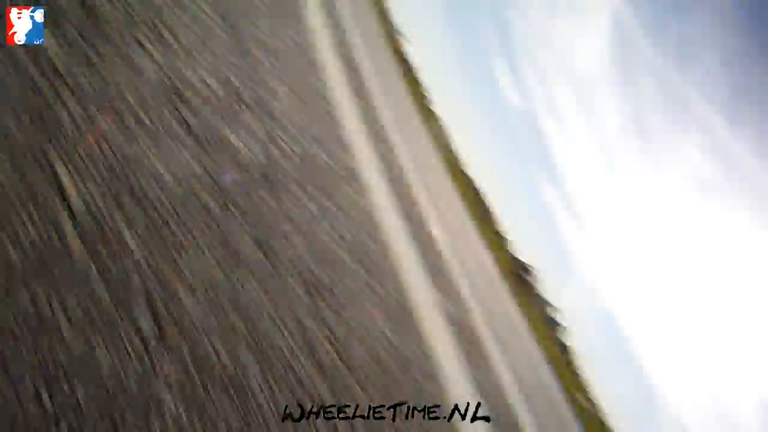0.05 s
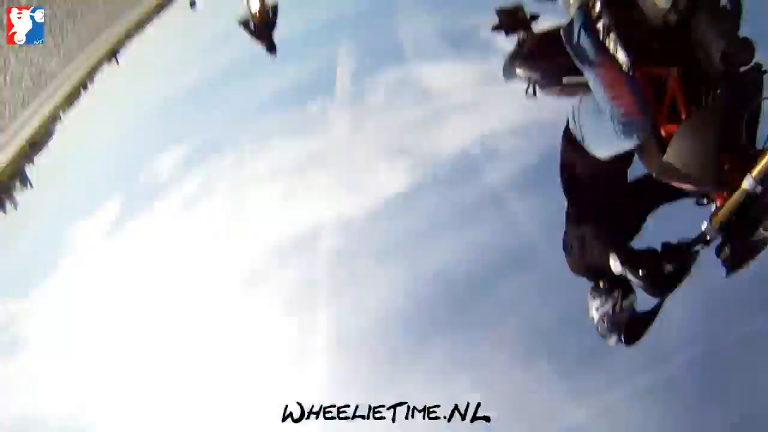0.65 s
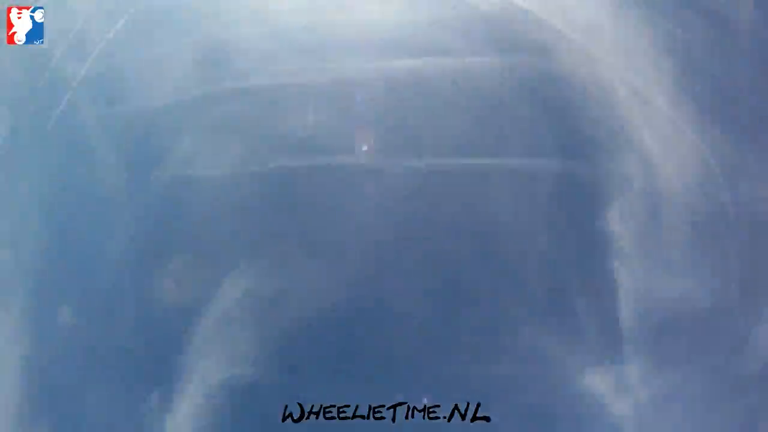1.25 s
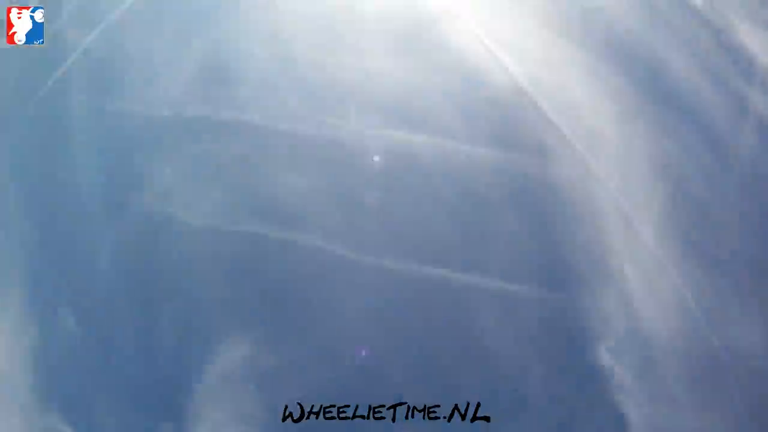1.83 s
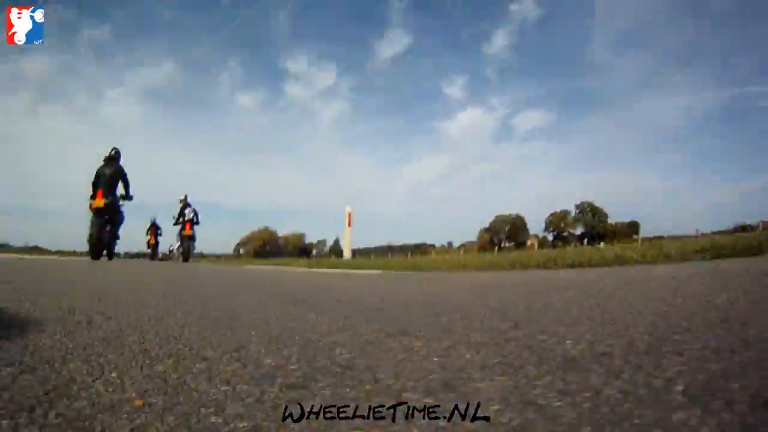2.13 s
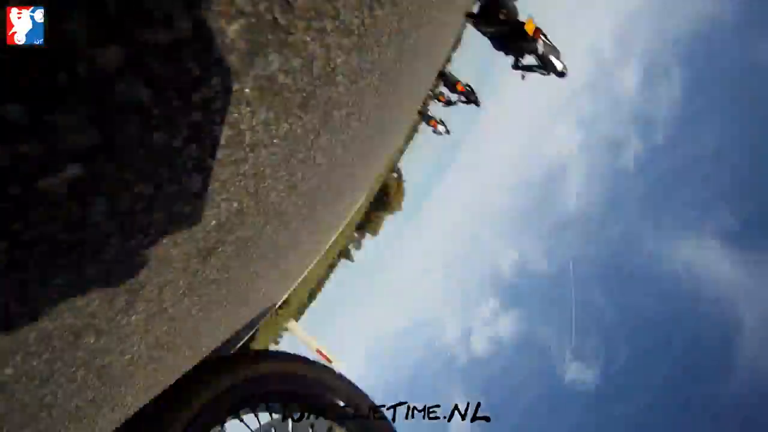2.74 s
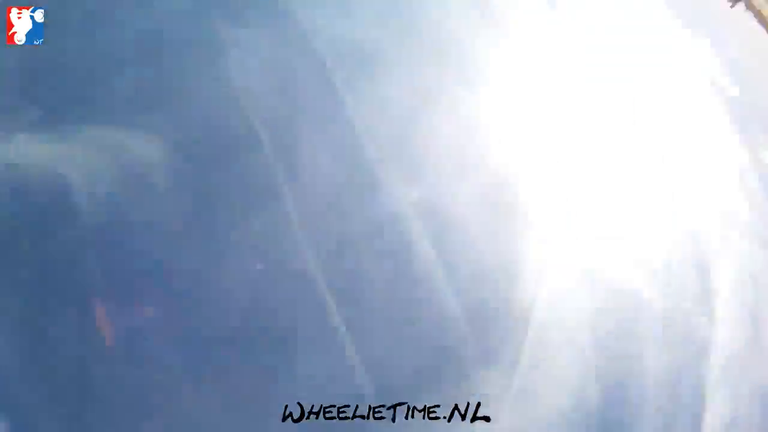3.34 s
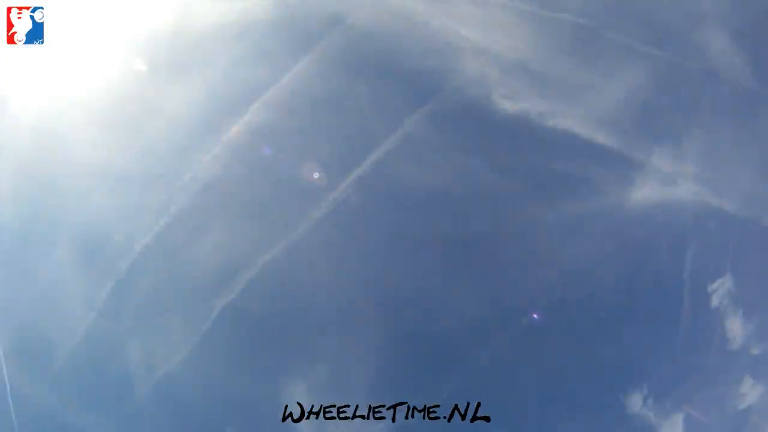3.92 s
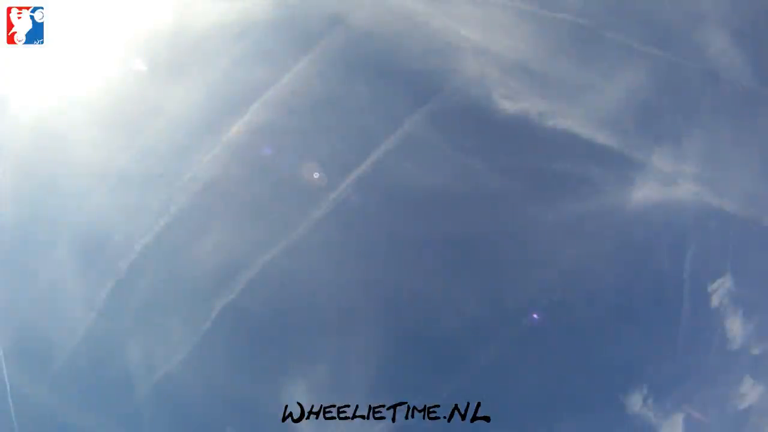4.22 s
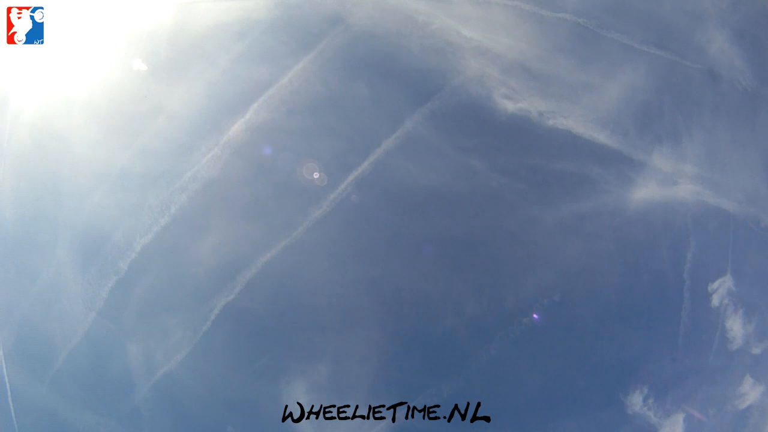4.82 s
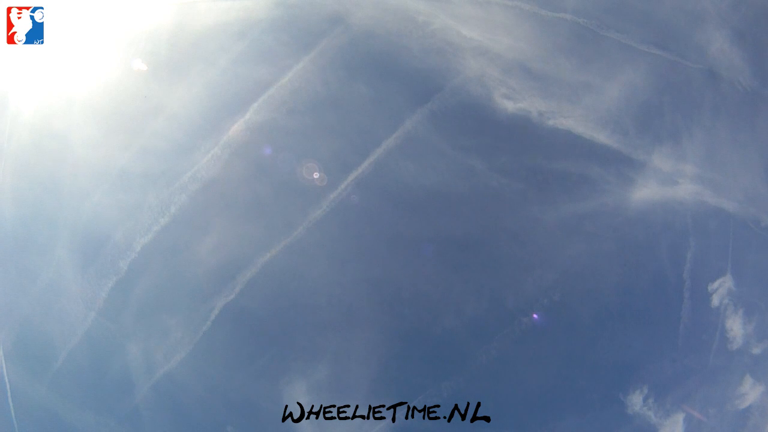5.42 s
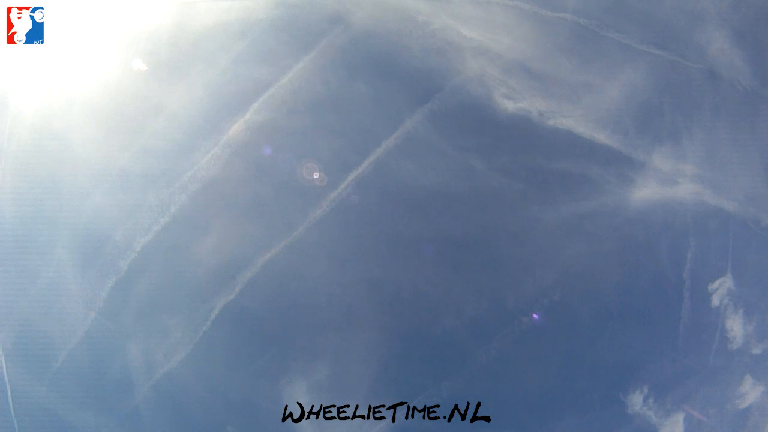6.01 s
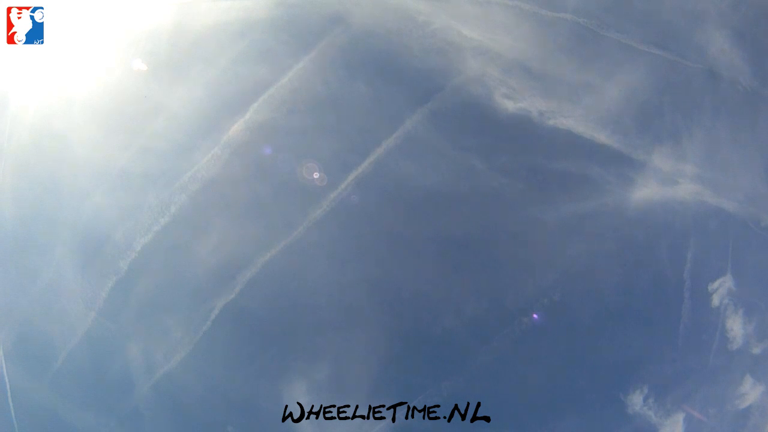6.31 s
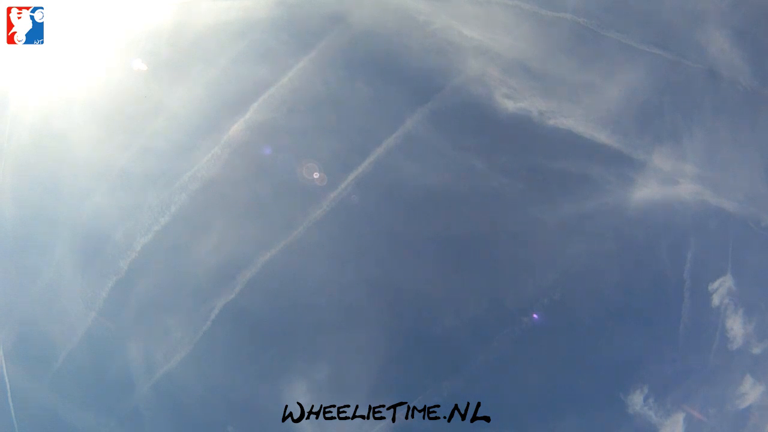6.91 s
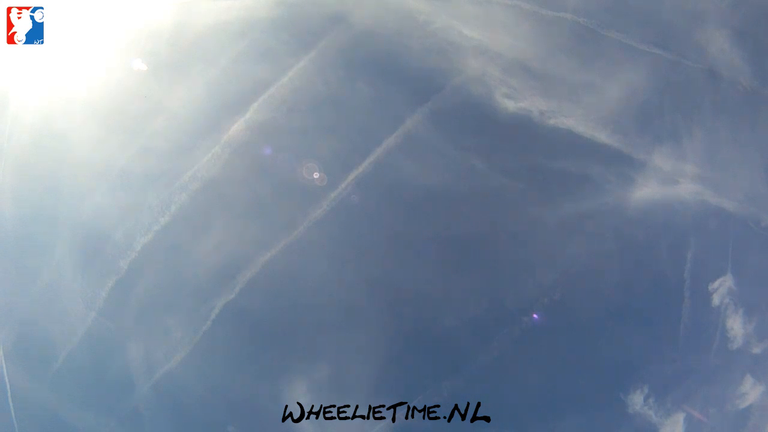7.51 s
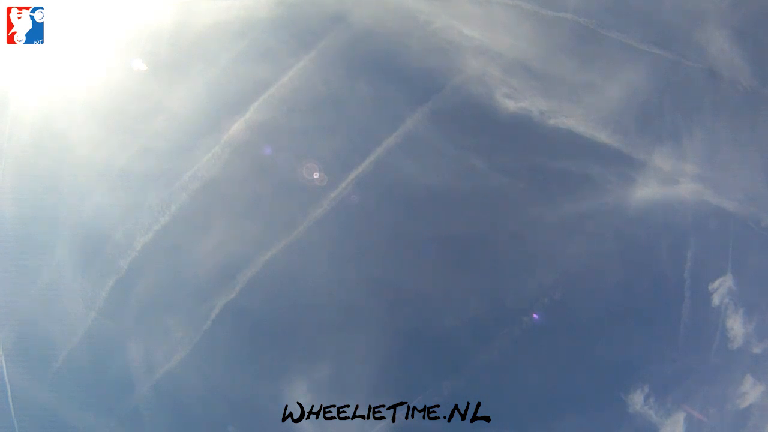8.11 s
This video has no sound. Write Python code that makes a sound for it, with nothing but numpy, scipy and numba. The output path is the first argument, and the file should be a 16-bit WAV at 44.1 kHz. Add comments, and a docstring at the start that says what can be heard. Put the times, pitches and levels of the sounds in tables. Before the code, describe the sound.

Harsh plastic knocks tumble over a road through buffeting wind, then give way to low motorcycle engines and a soft brake rasp.

```python
"""Camera tumbling down a road

A small camera falls off a motorcycle, clatters over asphalt, rocks to rest and lies in the wind
while bikes run nearby with throbbing exhausts, a gear whine, a rush of tyres and rasping brakes.
Each knock rings the plastic shell and the hard ones overload the microphone; the gain control ducks,
then lets wind and engines swell back. Samples held at 12000 a second add a glassy fizz."""
import sys
import numpy as np
from scipy import signal
from scipy.fft import rfft, irfft
from scipy.io import wavfile
from scipy.ndimage import uniform_filter1d, map_coordinates
from numba import njit

SR = 44100
rng = np.random.default_rng(int(sys.argv[2]) if len(sys.argv) > 2 else 0)


def output_pcm(signal):
    """Save a mono or channel-first signal as 16-bit PCM at the path in sys.argv[1].

    Samples are clipped to [-1, 1] before scaling.
    """
    pcm = np.clip(np.atleast_2d(signal).T, -1, 1) * 32767
    wavfile.write(sys.argv[1], SR, np.round(pcm).astype(np.int16))


N = 359415
TIME = np.arange(N) / SR

# air past the microphone, strong in flight and a breeze at rest: t/s, rumble level/dB
AIRFLOW = [(0, -11.5), (.17, -17.5), (.3, -16.5), (.5, -12.5), (1, -18.5), (1.55, -8), (2.2, -16.5),
           (2.5, -24.5), (2.75, -17), (3.05, -26.5), (3.3, -20.5), (3.75, -23), (4.2, -21), (5, -26),
           (5.9, -25.5), (6.6, -28), (7.5, -23.5), (8.15, -25.5)]
# tone colours of the low rumble and of the air and tyre hiss: f/Hz, level/dB
RUMBLE_SPECTRUM = [(20, -12), (35, -9.5), (60, 0.5), (110, 3.5), (200, -5), (320, -9.5), (520, -15),
                   (640, -20), (790, -38.5), (1200, -62.5)]
HISS_SPECTRUM = [(300, -20.5), (700, -0.5), (1100, 2.5), (1450, 0), (1900, 1), (2450, 1.5), (3300, -0.5),
                 (4200, -11.5), (5500, -35)]
# one bike rides off, one passes, one rolls up: t/s, exhaust pulse rate/Hz, level/dB
LEAVING_RIDE = [(0, 54, -34), (.4, 55.7, -22), (1.1, 53.5, -28), (1.6, 47, -25), (2.25, 46.5, -21),
                (2.42, 46.5, -15.5), (2.7, 45, -21), (3.1, 42, -23), (3.7, 48, -39)]
PASSING_RIDE = [(3.8, 28.5, -31), (4.05, 28, -25), (4.35, 27.8, -20), (4.62, 25.65, -21.5),
                (5.3, 25.7, -23), (5.47, 28, -19), (5.56, 28, -25), (5.8, 24, -30), (6.1, 24, -50)]
ROLLING_RIDE = [(5.7, 68.15, -38.5), (6.1, 67.85, -28), (6.35, 67.78, -26), (6.7, 67.25, -24.5),
                (7, 68.82, -24), (7.4, 68.4, -25), (7.7, 68.66, -27), (8.15, 69.3, -25.5)]
# resonances of their exhaust pipes: f/Hz, width/Hz, level/dB
LEAVING_EXHAUST = [(72, 31, -6), (105.5, 24, -0.5), (168, 25, -1.5)]
PASSING_EXHAUST = [(56, 33, -5), (134, 24.4, 2.5), (159.4, 60, -7), (236, 26, -6), (291.5, 20, -11.5),
                   (332, 11, -15), (425.5, 23.6, -8), (581, 29, -20)]
ROLLING_EXHAUST = [(69, 43, -7), (136.6, 21, -1), (267.7, 41, -9), (370, 114, -19)]
# grit touching the shell: t/s, level/dB
GRIT_TICKS = [(.109, -21), (.153, -26.5), (4.258, -40), (6.074, -36), (6.127, -41), (6.901, -46),
              (6.924, -35), (6.972, -42)]
# shell hits on asphalt, 0 dB near microphone overload: t/s, crack level/dB, thud level/dB, clack f/Hz
ROAD_HITS = [(0.5091, 13, 8, 3049), (0.518, 8, -2, 2960), (0.764, 15.5, 8.5, 2815),
             (1.0371, 14.5, 10.5, 3070), (1.07, 8, 4, 2660), (1.16, 10, 3.5, 3302), (1.191, 11, 6, 4400),
             (1.2751, 11.5, -4.5, 3287), (1.2993, 12.5, 6, 3700), (1.3663, 10.5, -4, 2800),
             (1.3858, 9, 0.5, 2700), (1.3949, 16, 8.5, 2570), (1.4728, 17.5, 6, 2783),
             (1.488, 16, -5, 3520), (1.597, 9, 4.5, 2536), (1.6228, 14.5, 11, 3225), (1.6349, 6, 1, 2420),
             (1.6767, 4, 6, 3550), (1.7003, 12.5, 2.5, 3058), (1.7438, 6.5, -2, 2460),
             (1.7889, 12.5, 1.5, 3624), (1.8301, 18, 9, 3800), (1.877, 10.5, 5, 2895),
             (1.9183, 11.5, 10, 3565), (1.9326, 8.5, 7.5, 2620), (1.944, 15, 11, 2434),
             (1.965, 4, 6.5, 3750), (2.0103, 10, 2.5, 1171), (2.0601, 8.5, -0.5, 2720),
             (2.117, 13.5, 8.5, 2640), (2.1539, 13, 9, 1200), (2.2415, 5, -4, 2990),
             (2.2618, 7.5, 5.5, 3750), (2.2932, 1, 4.5, 3320), (2.561, 15.5, 4.5, 2400),
             (2.57, 11.5, 4.5, 2650), (2.7926, 7, 7.5, 2206), (2.8427, 1, 3, 2716), (3.0888, 6, 16.5, 3835),
             (3.099, 2.5, 14, 3070), (3.118, 13, 6, 2156), (3.3238, 19, 23.5, 2162), (3.347, 8, 10, 2810),
             (3.3953, -3, 8.5, 4060), (3.443, -9, -3, 2680), (3.4822, 13, 14, 3860), (3.531, 3, 4.5, 3750),
             (3.568, -7, 13.5, 3630), (3.581, 5, 16.5, 3830), (3.6275, 3.5, 16.5, 3930),
             (3.652, -5, -14, 2900)]
# modes of the plastic shell: f/Hz, level/dB, t60/s
SHELL_MODES = [(287, -28, 0.063), (520.2, -11, 0.036), (688, -16, 0.038), (1173, -3, 0.031),
               (1597, -25, 0.027), (2135, -12, 0.023), (2480, -6, 0.018), (2910, -2.5, 0.012),
               (3137, -19, 0.029), (3709, -11.5, 0.028), (4263, -24.5, 0.029), (4546, -26.5, 0.031)]
# pads on a brake disc: firmest touch t/s, level/dB, swell/(dB/s), fade/(dB/s), centre f/Hz,
# upward glide/(share of f on either side)
BRAKE_RUBS = [(5.73, -49, 55, 117, 3180, 0.0083), (7.48, -43, 31, 21.5, 2943, .12)]
# resonances of the disc: f/Hz, level/dB
DISC_MODES = [(2530, 2.5), (3050, -1), (3520, -2.5), (4250, -6)]

OVERLOAD_DB = 16.5   # where the microphone saturates
ROCK_GAP_S = .012   # between touches as the shell settles


def from_db(db):
    """Decibels to gain."""
    return 10 ** (np.asarray(db) / 20)


def unit_rms(x):
    """Scale to unit rms."""
    return x / np.sqrt(np.mean(x ** 2) + 1e-20)


def automation(rows):
    """The columns of a breakpoint curve at every sample."""
    times, *columns = np.transpose(rows)
    return [np.interp(TIME, times, column) for column in columns]


def drift(rate):
    """Smooth random motion of unit rms that changes about rate times a second."""
    knots = rng.standard_normal(30000)
    return unit_rms(map_coordinates(knots, [TIME * rate], order=2, mode="wrap"))


def coloured_noise(spectrum):
    """Noise of unit rms with the given spectrum."""
    hz, db = np.transpose(spectrum)
    bins = np.maximum(np.fft.rfftfreq(N, 1 / SR), 1)
    gain = from_db(np.interp(np.log(bins), np.log(hz), db)) * np.minimum(bins / hz[0], 1)
    return unit_rms(irfft(rfft(rng.standard_normal(N)) * gain, N))


def band_noise(low_hz, high_hz):
    """Noise of unit rms between two soft edges."""
    band = signal.butter(2, [low_hz, high_hz], "band", fs=SR, output="sos")
    return unit_rms(signal.sosfilt(band, rng.standard_normal(N)))


def narrow_noise(hz, rate):
    """Noise of unit rms around a pitch; it wavers about rate times a second."""
    phase = 2 * np.pi * np.cumsum(hz * np.ones(N)) / SR
    return drift(rate) * np.cos(phase) + drift(rate) * np.sin(phase)


def ring(age, hz, t60):
    """A struck mode: a dying sine, silent before age 0."""
    age = np.maximum(age, 0)
    return np.sin(2 * np.pi * hz * age) * from_db(-60 * age / t60)


def resonance(x, hz, width_hz):
    """A band resonance with unity gain at its peak."""
    r = np.exp(-np.pi * width_hz / SR)
    poles = [1, -2 * r * np.cos(2 * np.pi * hz / SR), r * r]
    return signal.lfilter(np.array([1, 0, -1]) * (1 - r * r) / 2, poles, x + 1e-18)


def wind(breeze_db=-25, breeze_hiss_db=-47.5, flutter_db=1.5):
    """Eddies at the microphone port rumble in lumps; air hisses, louder and brighter with speed."""
    rumble_db, = automation(AIRFLOW)
    hiss_db = breeze_hiss_db + .91 * (rumble_db - breeze_db)
    eddies = drift(35)
    brightness = from_db(-6 + 2 * np.minimum(hiss_db + 45, 0))
    hiss = coloured_noise(HISS_SPECTRUM) + brightness * band_noise(1800, 5200)
    rumble = from_db(rumble_db + eddies) * coloured_noise(RUMBLE_SPECTRUM)
    return rumble + from_db(hiss_db + flutter_db * eddies) * hiss


def buffet(trim_db=-17.5, knee_db=-15, gust_db=6.5):
    """In fast flight small eddies tear off the shell and roar above the rumble."""
    rumble_db, = automation(AIRFLOW)
    roar_db = rumble_db + trim_db + 2 * np.minimum(rumble_db - knee_db, 0)
    return from_db(roar_db + gust_db * drift(30)) * band_noise(330, 700)


def engine(ride, pipe, rough_db, wobble):
    """Exhaust pulses of uneven strength ring the resonances of the pipe."""
    pulse_hz, level_db = automation(ride)
    cycles = np.cumsum(pulse_hz * (1 + wobble * drift(18))) / SR
    pulses = np.diff(np.floor(cycles), prepend=0) * from_db(rough_db * rng.standard_normal(N))
    exhaust = sum((-1) ** k * from_db(db) * resonance(pulses, hz, width)
                  for k, (hz, width, db) in enumerate(pipe))
    muffled = signal.sosfilt(signal.butter(4, 620, fs=SR, output="sos"), exhaust)
    soft_gate = uniform_filter1d(1. * ((TIME >= ride[0][0]) & (TIME <= ride[-1][0])), size=4000)
    return from_db(level_db) * soft_gate * unit_rms(muffled)


def gear_whine(order=6, trim_db=.5, fade_start_s=.95, fade_db_per_s=38):
    """The leaving bike's gears sing at a multiple of its exhaust rate, then fade with distance."""
    pulse_hz, bike_db = automation(LEAVING_RIDE)
    level_db = bike_db + trim_db - fade_db_per_s * np.maximum(TIME - fade_start_s, 0) + drift(20)
    mesh_hz = order * pulse_hz * (1 + .0085 * drift(30))
    return from_db(level_db) * np.sin(2 * np.pi * np.cumsum(mesh_hz) / SR)


def grit_ticks(t60=.026):
    """Specks of grit tap the shell with tiny dull ticks."""
    times, db = np.transpose(GRIT_TICKS)
    taps = np.zeros(N)
    taps[np.round(times * SR).astype(int)] = from_db(db)
    envelope = signal.lfilter([1], [1, -from_db(-60 / (t60 * SR))], taps + 1e-18)
    return envelope * (band_noise(430, 2900) + from_db(6) * band_noise(210, 600))


def tumble(attack_s=.00088, contact_s=.0084, longest_flight_s=.3, body_below_hz=900, lid_below_hz=1400):
    """Each knock crushes grit while the shell touches the road, and rings the shell's modes."""
    out, age = np.zeros(N), TIME[:SR // 2]
    grit, push = band_noise(630, 6000), band_noise(120, 510)
    contact = np.sin(np.pi * np.minimum(age / contact_s, 1) ** .5) ** 2
    attack = np.minimum(age / attack_s, 1) ** 2   # force builds as the shell meets the stones
    hits = np.vstack([ROAD_HITS, rocking()])
    hits = hits[np.argsort(hits[:, 0])]
    flights = np.clip(np.diff(hits[:, 0], prepend=0), ROCK_GAP_S, longest_flight_s)
    for (t, crack_db, thud_db, clack_hz), flight_s in zip(hits, flights):
        span = slice(round(t * SR), round(t * SR) + len(age))
        knock = contact * (from_db(crack_db - 8) * grit[span] + from_db(thud_db - 13) * push[span])
        # a longer flight flexes the shell more and deepens the thud
        thud_hz = 468.2 * (.07 / flight_s) ** .12
        knock += from_db(thud_db + .5) * ring(age, thud_hz, t60=.023)
        # the corner that lands sets the pitch of the clack
        knock += from_db(crack_db + 2.5) * ring(age, clack_hz, t60=.016)
        # the lid takes a share of crack and thud, depending on how the shell lands
        lid_db = .78 * crack_db + .22 * thud_db - 9 + 5 * rng.uniform(-1.4, 1)
        for hz, db, t60 in SHELL_MODES:
            strength, detune, lag = rng.uniform(-1.029, 1, 3)
            force_db = thud_db if hz < body_below_hz else lid_db if hz < lid_below_hz else crack_db
            mode = ring(age - .001 * abs(lag), hz * (1 + .035 * detune), t60)
            knock += from_db(force_db + db + 4.5 * strength) * mode
        # hard knocks throw the camera clear of the road, where one mode hums on
        hum_hz = 518 * (1 + .015 * rng.uniform(-1.1, 1))
        knock += from_db(min(crack_db - 5.5, 0) - 25.5) * ring(age, hum_hz, t60=.33)
        out[span] += knock * attack
    return from_db(OVERLOAD_DB) * out


def rocking(start_s=3.594, touches=9, jitter_s=.00188, fade_db_per_s=27, clack_hz=3660):
    """The shell rocks on its edges in quick, dull, fading touches: rows like those of ROAD_HITS."""
    age = ROCK_GAP_S * np.arange(touches)
    jitter, softness = rng.uniform(-1.11, 1, (touches, 2)).T
    times = start_s + age + jitter_s * jitter
    loss_db = fade_db_per_s * age + 3 * softness
    return np.transpose([times, -15.5 - loss_db, 2 - loss_db, np.full(touches, clack_hz)])


def tyres(pass_s=2.818, width_s=.14, spin_hz=4, facing_s=2.5):
    """Tyres hiss past, in waves as the spinning camera turns its microphone towards them and away."""
    nearness = 1 / (1 + ((TIME - pass_s) / width_s) ** 2)
    level_db = -33 + 2.5 * np.cos(2 * np.pi * spin_hz * (TIME - facing_s))
    hiss = coloured_noise(HISS_SPECTRUM) + from_db(-1.5) * band_noise(1900, 3400)
    return from_db(level_db) * nearness * hiss


def brake(glide_s=.1, reach_octaves=.36, holes_hz=81):
    """Friction swishes up in pitch and excites nearby disc modes; the disc's holes chop it to a rasp."""
    out = np.zeros(N)
    chop = 1 + .8 * np.cos(2 * np.pi * np.cumsum(holes_hz + 1.5 * drift(5)) / SR)
    for t, db, swell_db_per_s, fade_db_per_s, hz, glide in BRAKE_RUBS:
        age = TIME - t
        centre_hz = hz * (1 + glide * np.tanh(age / glide_s))
        rub = from_db(-2) * narrow_noise(centre_hz, rate=1700)
        rub += from_db(-16.5) * narrow_noise(1.6 * centre_hz, rate=1700)
        for mode_hz, mode_db in DISC_MODES:
            coupling = np.exp(-(np.log2(mode_hz / centre_hz) / reach_octaves) ** 2)
            rub += from_db(mode_db) * coupling * narrow_noise(mode_hz, rate=200)
        envelope = from_db(db + np.minimum(swell_db_per_s * age, -fade_db_per_s * age))
        out += envelope * rub * chop
    return out


def scene():
    """The mono mix of everything that reaches the microphone."""
    bikes = engine(PASSING_RIDE, PASSING_EXHAUST, rough_db=.7, wobble=.0015)
    bikes += engine(LEAVING_RIDE, LEAVING_EXHAUST, rough_db=3.5, wobble=.012)
    bikes += engine(ROLLING_RIDE, ROLLING_EXHAUST, rough_db=2.4, wobble=.006)
    return (tumble() + grit_ticks() + wind() + tyres() + buffet() + bikes + gear_whine() + brake())[None]


@njit
def gain_control(x, start_db, limit, attack_db_per_s, release_db_per_s, detector_s):
    """Gain in dB: it ducks while the output is over the limit, else creeps back up to 0."""
    out, gain_db, level = np.zeros(len(x)), start_db, 0.
    for i in range(len(x)):
        level += (abs(x[i]) * 10 ** (gain_db / 20) - level) / (detector_s * SR)
        if level > limit:
            gain_db -= attack_db_per_s / SR
        else:
            gain_db = min(gain_db + release_db_per_s / SR, 0.)
        out[i] = gain_db
    return out


def record(dry, gain_lag_s=.003, hold_hz=12000, cutoff_hz=16441):
    """The camera's lo-fi chain: microphone overload, ducking, a clipping converter, held samples."""
    ceiling = from_db(OVERLOAD_DB)
    saturated = ceiling * np.tanh(dry[0] / ceiling)
    mic = signal.sosfilt(signal.butter(1, 15, "high", fs=SR, output="sos"), saturated)
    gain_db = gain_control(mic, start_db=-24., limit=from_db(-10.5), attack_db_per_s=2900,
                           release_db_per_s=115, detector_s=.0017)
    # the gain acts late, so hard knocks pass as flat-topped bursts
    late_db = np.interp(TIME - gain_lag_s, TIME, gain_db)
    crunched = np.clip(mic * from_db(late_db), -1.3, 1.3)
    dulled = signal.sosfilt(signal.butter(8, 5300, fs=SR, output="sos"), crunched)
    stored = np.clip(signal.resample_poly(dulled, hold_hz, SR), -.95, .95)
    # holding each sample mirrors the spectrum around hold_hz: the glassy fizz
    held = signal.resample_poly(np.repeat(stored, 4), SR, 4 * hold_hz)[:N]
    return signal.sosfilt(signal.cheby2(16, 70, cutoff_hz, fs=SR, output="sos"), held)[None]


dry = scene()
out = record(dry)
output_pcm(out)
```